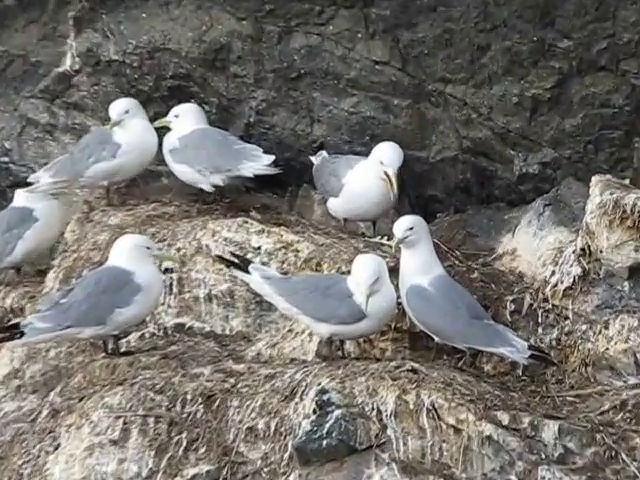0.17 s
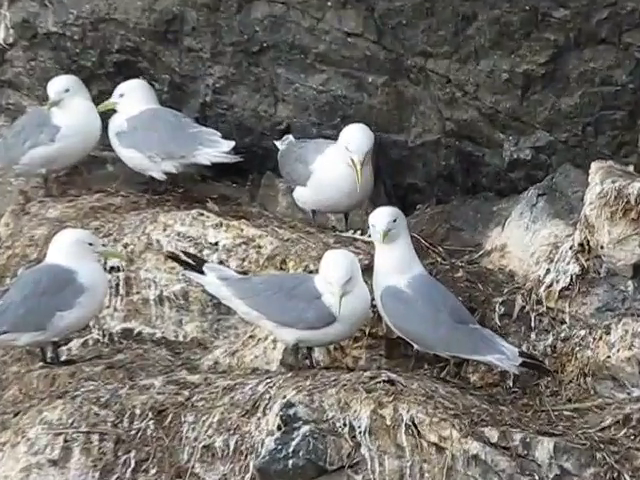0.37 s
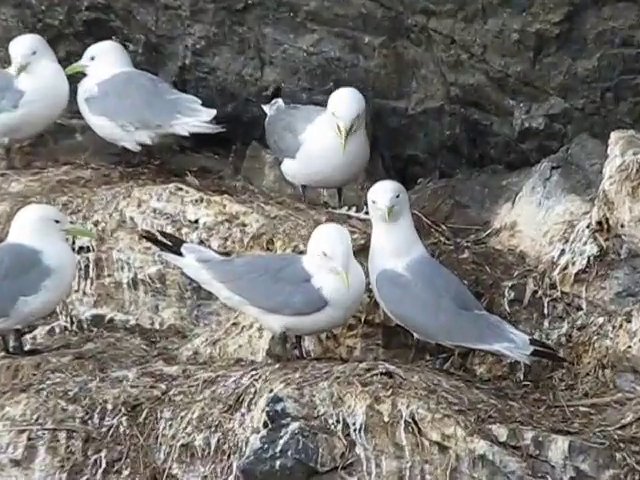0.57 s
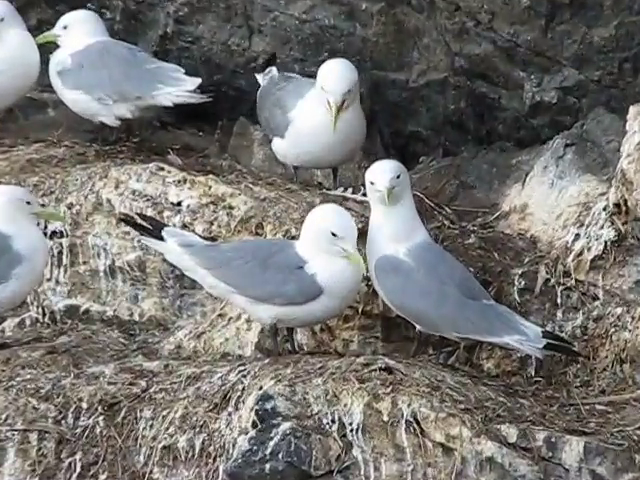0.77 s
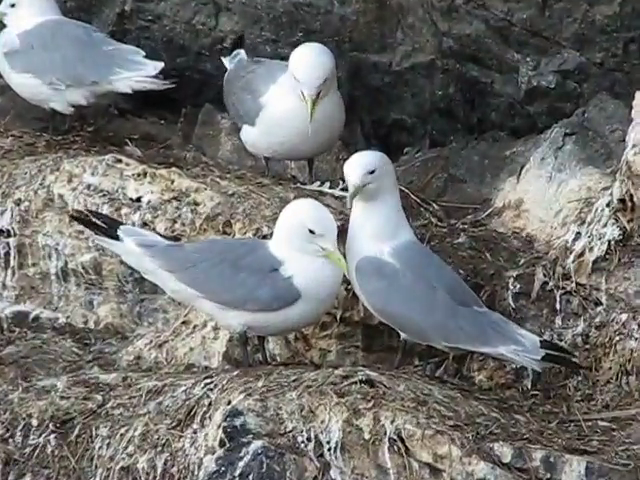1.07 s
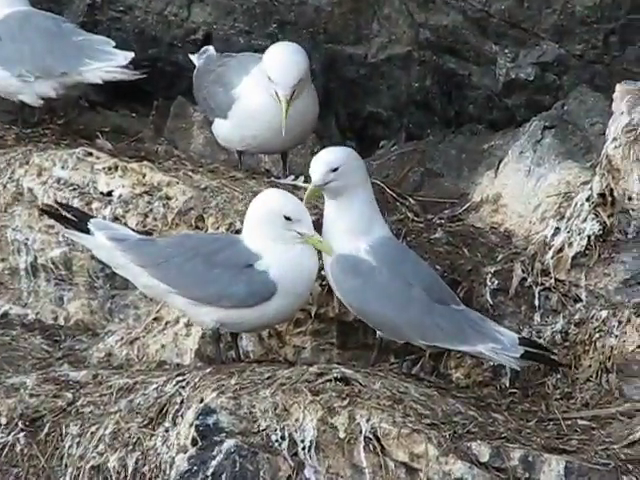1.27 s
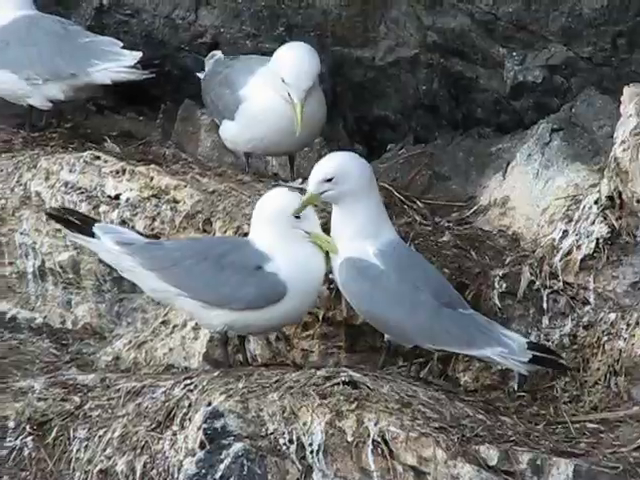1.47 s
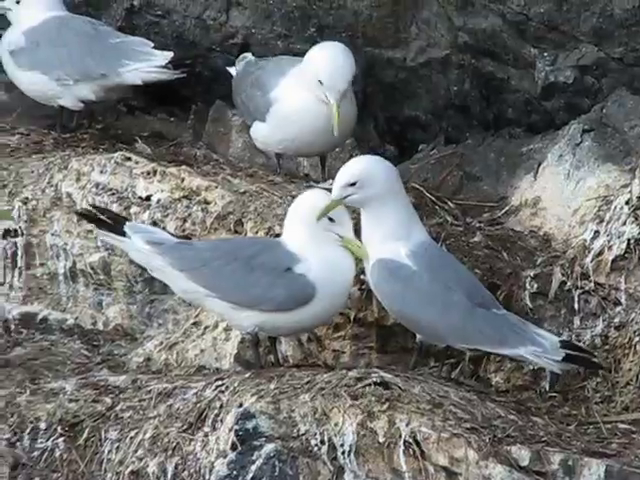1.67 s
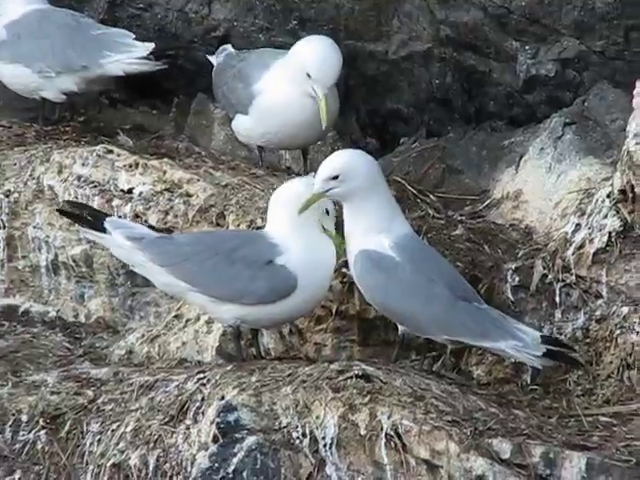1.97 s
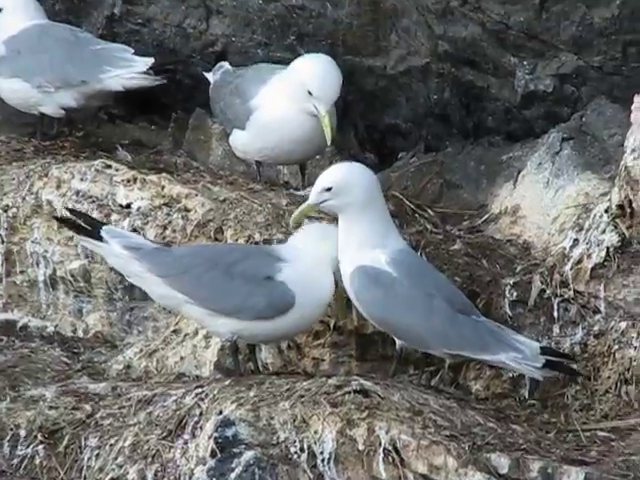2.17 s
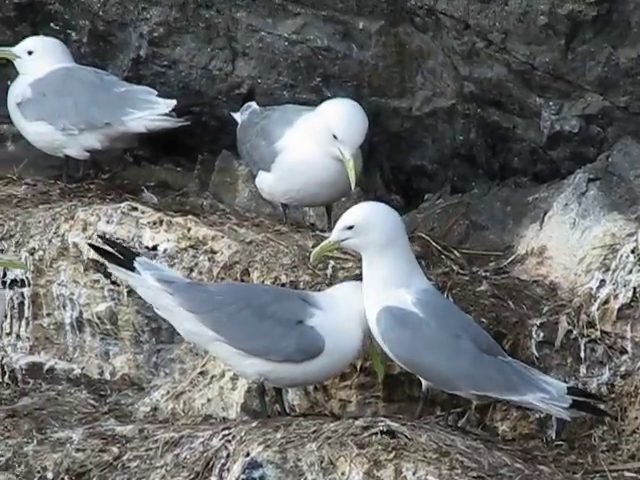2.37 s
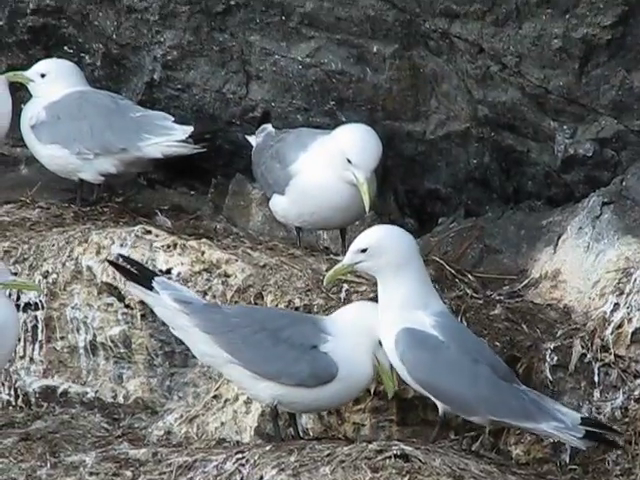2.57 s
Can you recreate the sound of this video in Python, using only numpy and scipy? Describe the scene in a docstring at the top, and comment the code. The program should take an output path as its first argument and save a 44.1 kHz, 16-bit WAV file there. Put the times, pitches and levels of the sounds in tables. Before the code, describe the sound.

Kittiwake colony clamoring on a sea cliff, nasal hoarse calls overlapping above steady surf

```python
"""A sea cliff with a kittiwake colony. Near birds throw nasal, partly hoarse notes and wavering wails across
each other: harmonics of a gliding pitch, filtered by throat and mouth and roughened by random modulation.
Thin squeaks sound among them, and upper harmonics of the calls ring out, each drawn as one wavering partial.
The rock returns the near calls as sparse decaying echoes. Behind them swell the far colony, a sum of random
calls, and a nearly steady surf of shaped noise."""
import sys
import numpy as np
from scipy import signal
from scipy.fft import rfft, irfft
from scipy.io import wavfile
from scipy.ndimage import uniform_filter1d

SR = 44100
rng = np.random.default_rng(int(sys.argv[2]) if len(sys.argv) > 2 else 0)


def pcm_store(signal):
    """Save signal as 16-bit PCM."""
    levels = np.round(np.clip(np.atleast_2d(signal), -1, 1) * 32767)
    wavfile.write(sys.argv[1], SR, levels.astype(np.int16).T)


N = 120393  # length [samples]


def amp(db):
    """Level: decibels to amplitude gain."""
    return 10 ** (np.asarray(db) / 20)


def unit(x):
    """Normalization: scales to an rms of 1."""
    return x / np.sqrt(np.mean(x ** 2) + 1e-20)


def read(points, hz):
    """Interpolation of a spectrum along a logarithmic frequency axis."""
    f, value = np.transpose(points)
    return np.interp(np.log(hz + 1), np.log(f + 1), value)


def over_time(points):
    """Linear interpolation of a control curve at every sample."""
    return np.interp(np.arange(N) / SR, *np.transpose(points))


def filtered(x, gain_db):
    """Zero-phase filtering: scales the spectrum by the level that gain_db(hz) returns."""
    size = x.shape[-1]
    return irfft(rfft(x) * amp(gain_db(np.fft.rfftfreq(size, 1 / SR))), size)


def add(mix, start_s, sound):
    """Superposition: adds a stereo sound to the mix at a time."""
    at = round(start_s * SR)
    part, sound = mix[:, max(at, 0):], sound[:, max(-at, 0):]
    size = min(part.shape[1], sound.shape[1])
    part[:, :size] += sound[:, :size]


def wobble(t, hz, size=256):
    """Random modulation: normal values at the given rate, joined by straight lines."""
    return np.interp(t * hz, np.arange(size), rng.standard_normal(size))


def sides(db):
    """Interaural level difference: left and right gains, positive to the left."""
    return amp(np.array([[.5], [-.5]]) * db)


ATTACK_S, RELEASE_S = 0.0047, 0.0098
JITTER, JITTER_HZ, RASP_HZ = 0.02, 130.3, 257.5  # pitch jitter as a share at full roughness; rates
UNEVEN_DB = 1.5  # chance differences between the harmonics of a call
# Share of the roughness that a harmonic takes: (frequency [Hz], share)
RASP_SHARE = [(1500, .45), (4500, .45), (8000, 1.3), (12000, 2.2)]
# Phase by which the left microphone leads: (frequency [Hz], phase [rad])
MIC_PHASE = [(100, 5.1), (1000, 0.4), (1640, 0.78), (3100, 1.68), (4200, 1.32), (5700, 1.97), (9000, 2.1),
             (15000, 4.7)]


def voice(pitch, colour, rough, pan_db, direction, count=26, release_s=RELEASE_S):
    """Source-filter voice: jittered harmonics weighted by the throat; modulation sidebands make the rasp."""
    t = np.arange(len(pitch)) / SR
    rough = np.clip(rough, 0, 1)
    jittered = pitch * (1 + JITTER * rough * wobble(t, JITTER_HZ))
    fundamental = np.exp(2j * np.pi * np.cumsum(jittered) / SR)
    out, partial = np.zeros((2, len(t))), np.ones(len(t), complex)
    shake = 1 + rough * 0.45 * wobble(t, RASP_HZ)
    for k in range(1, count + 1):
        partial = partial * fundamental  # the next power is the next harmonic
        hz = k * pitch.mean()
        rasp = min(rough * read(RASP_SHARE, hz), 1)
        smear = wobble(t, 2 * RASP_HZ) + 1j * wobble(t, 2 * RASP_HZ)
        own = amp(UNEVEN_DB * rng.standard_normal()) * np.exp(2j * np.pi * rng.random())
        audible = hz < SR / 2
        line = own * partial * amp(colour(k * pitch)) * audible * (1 - rasp + rasp * smear)
        right = line * np.exp(-1j * direction * read(MIC_PHASE, hz))
        out += [line.real, right.real]
    fade = np.clip(t / ATTACK_S, 0, 1) * np.clip((t[-1] - t) / release_s, 0, 1)
    return unit(out * shake) * fade * sides(pan_db)


MOUTH_WIDTH_HZ = 270  # half-width of the mouth resonance
GAPE, EDGE_DB = 0.035, -4  # nearly shut bill at a call's ends: share the resonance falls, level
SCOOP, SCOOP_S, DROOP, DROOP_S = .02, .007, .035, .008  # pitch slides into and drops out of a call [share]
# Range of the near birds' directions, as multiples of the microphone phase: (lowest, highest)
NEAR_DIRECTIONS = (0.25, 1.2)
# Throat response of a near bird: (frequency [Hz], level [dB])
THROAT = [(500, -15.5), (1080, -8.5), (1300, 0), (1700, -0.5), (2200, -7.5), (2800, 0), (4000, -5),
          (5000, -4), (6100, -11), (6850, -21), (7600, -21.5), (10000, -32.5), (15000, -41)]


def near_call(pitch, db, mouth_hz, mouth_db, rough, pan_db):
    """Moving formant: the call swells as the bill opens; the mouth resonance follows gape and pitch."""
    t = np.arange(len(pitch)) / SR
    shut = (2 * t / t[-1] - 1) ** 2
    centre_hz = mouth_hz * pitch / pitch.mean() * (1 - GAPE * (shut - shut.mean()))

    def colour(hz):
        """Vocal-tract response: the throat level plus the mouth's resonance peak."""
        return read(THROAT, hz) + mouth_db / (1 + ((hz - centre_hz) / MOUTH_WIDTH_HZ) ** 2)
    slide = 1 - SCOOP * np.exp(-t / SCOOP_S) - DROOP * np.exp((t - t[-1]) / DROOP_S)
    direction = rng.uniform(*NEAR_DIRECTIONS)
    return amp(db + EDGE_DB * shut) * voice(pitch * slide, colour, rough, pan_db, direction)


# Nasal notes: (start [s], length [s], first pitch [Hz], middle pitch [Hz], last pitch [Hz], level [dB],
# mouth resonance [Hz], its height [dB], roughness [0-1], left-right level [dB])
NOTES = [(0.075, 0.073, 545.6, 552, 552, -22.5, 2730, 10, 0.7, -5),
         (0.126, 0.069, 600, 614, 621, -25.5, 4290, 9.5, 0.13, 1),
         (0.114, 0.04, 633, 632, 630, -25, 2540, 8, 0.65, -1),
         (0.176, 0.06, 568.5, 599, 617, -22.5, 3000, 5, 0.42, -4),
         (0.277, 0.049, 611, 640, 670, -22.5, 2600, 15, 0.37, -4),
         (0.309, 0.036, 592, 607, 633, -20, 3040, 5, 0.25, -5),
         (0.335, 0.058, 558, 561, 541, -21, 1680, 7, 0.43, -3),
         (0.342, 0.076, 528, 536, 520, -25.5, 3750, 10, 0.8, -2),
         (0.344, 0.069, 654, 651, 648, -22.5, 2630, 17, 0.6, -5),
         (0.626, 0.045, 822, 817, 810, -22, 1635, 8, 0, -4),
         (0.627, 0.028, 663, 651, 640, -25, 3330, 15, 0, -7),
         (0.649, 0.027, 562, 599, 624, -20.5, 3000, 6, 0.54, -8),
         (0.757, 0.045, 677, 633, 660, -20, 3180, 7, 0.15, -2),
         (0.81, 0.05, 670, 687, 666, -24, 3350, 27, 0.42, 1),
         (0.815, 0.055, 633, 596, 523, -27.0, 1790, 13, 0.2, 3),
         (1.018, 0.039, 688, 698, 706, -20.0, 2840, 9, 0.3, -2),
         (1.052, 0.055, 498.7, 555.6, 570, -17, 2150, 12.5, 0.37, -2.5),
         (1.11, 0.053, 520, 505, 533, -19.5, 2670, 20, 0.87, -5),
         (1.176, 0.062, 675, 685, 673, -21, 3970, 9, 0.07, -1),
         (1.227, 0.06, 626.5, 651, 640, -20.5, 3780, 10.5, 0.44, 0),
         (1.231, 0.043, 562, 564, 550, -18.5, 3340, 10, 0.57, -2),
         (1.424, 0.054, 475, 502.5, 520, -23, 2500, 11, 0.2, 0),
         (1.466, 0.051, 526.5, 544, 560, -21, 2160, 8, 0.37, -1),
         (1.51, 0.05, 641, 664, 650, -24, 3950, 7, 0.37, -1),
         (1.56, 0.032, 613, 637, 667, -21, 3160, 15, 0, -3),
         (1.656, 0.08, 667, 685, 662, -23, 3420, 19, 0.19, -2),
         (1.679, 0.057, 725, 740, 766, -22, 3690, 8, 0.01, -2),
         (1.727, 0.048, 755, 763, 763, -24, 4640, 4, 0.35, 1.5),
         (1.897, 0.083, 538, 547.5, 570, -23.5, 2800, 10, 0.7, -1),
         (2.028, 0.037, 567, 558, 535, -19.5, 3330, 9, 0.38, -6),
         (2.124, 0.056, 637.5, 640, 630, -18.5, 3740, 11.5, 0.2, -2),
         (2.155, 0.033, 615, 630, 654, -32, 4430, 9, 0.8, -4),
         (2.2, 0.11, 680.6, 726, 724, -24.5, 3550, 9, 0.01, 5),
         (2.238, 0.099, 553, 549, 529, -23, 2200, 22, 0.65, -5),
         (2.328, 0.071, 644, 648, 620, -31, 3850, 29, 0, 4),
         (2.418, 0.11, 645, 645.5, 628, -26.5, 1930, 5, 0.5, 5),
         (2.589, 0.044, 556, 568, 564, -20.0, 2790, 11, 0.22, -3),
         (2.615, 0.051, 694, 692, 665, -24, 3440, 8, 0.1, 0),
         (2.672, 0.084, 612, 608, 620, -23.5, 4850, 5, 0.25, 0)]


def notes():
    """Frequency modulation: short nasal notes whose pitch bends in one parabolic arc."""
    out = np.zeros((2, N))
    for start, length, first, middle, last, *rest in NOTES:
        u = np.linspace(0, 1, int(length * SR))
        arc = np.polyfit([0, .5, 1], [first, middle, last], 2)
        add(out, start, near_call(np.polyval(arc, u), *rest))
    return out


WAIL_LEAD_S, WAIL_S = .05, .135  # time before the dip, whole length
DIP, DIP_S, WAIL_SAG, SAG_S = .057, .018, .02, .075  # depths are shares of the top pitch
# Wails: (time of the pitch dip [s], top pitch [Hz], level [dB], mouth resonance [Hz], its height [dB],
# roughness [0-1], left-right level [dB])
WAILS = [(.795, 570, -22, 2780, 8, 0.42, -5.5), (1.225, 560.6, -25, 2760, 10.5, 0.31, -6),
         (1.635, 564.6, -22, 2700, 5.5, 0.11, -4), (2.386, 556, -23, 2750, 10.5, 0.26, -4)]


def wails():
    """Frequency modulation: longer calls that dip in pitch, recover and sag away."""
    out = np.zeros((2, N))
    for dip_at, top_hz, *rest in WAILS:
        t = np.arange(0, WAIL_S, 1 / SR) - WAIL_LEAD_S
        dip = DIP * np.exp(-(t / DIP_S) ** 2)
        sag = WAIL_SAG * (t / SAG_S) ** 4
        add(out, dip_at - WAIL_LEAD_S, near_call(top_hz * (1 - dip - sag), *rest))
    return out


SQUEAK_TOP_AT, SQUEAK_FALL = .24, .27  # shares of the length and of the pitch
SQUEAK_HISS_DB = -11  # relative to the tone
# Squeaks: (start [s], length [s], top pitch [Hz], level [dB])
SQUEAKS = [(.395, .052, 1640, -29.5), (.897, .06, 1775, -29), (1.355, .06, 1680, -45)]
# Throat response of a squeak: (frequency [Hz], level [dB])
SQUEAK_THROAT = [(1700, -14), (3400, -4), (5000, 0), (6800, -11), (8400, -13), (11000, -20), (13000, -20),
                 (16000, -25)]


def squeaks():
    """Tone plus turbulence: high harmonics arch and fall, with a little hiss strongest early on."""
    def colour(hz):
        """Vocal-tract response of the squeak."""
        return read(SQUEAK_THROAT, hz)
    out = np.zeros((2, N))
    for start, length, top_hz, db in SQUEAKS:
        u = np.linspace(0, 1, int(length * SR))
        pitch = top_hz * (1 - SQUEAK_FALL * (u - SQUEAK_TOP_AT) ** 2)
        call = voice(pitch, colour, rough=.05, pan_db=0, direction=.45, count=9, release_s=.01)
        # the hiss takes half the throat's decibels
        hiss = filtered(rng.standard_normal((2, len(u))), lambda hz: colour(hz) / 2)
        hiss = unit(hiss * np.sin(np.pi * np.sqrt(u)))
        add(out, start, amp(db) * (call + amp(SQUEAK_HISS_DB) * hiss))
    return out


WAVER, WAVER_HZ = 0.0062, 89  # share of the frequency, rate
# Ringing upper harmonics: (start [s], length [s], frequency [Hz], glide [share of it], level [dB])
RINGING_HARMONICS = [(0.282, .055, 8500, -0.016, -49.5), (0.704, 0.027, 6800, -0.00055, -41.5),
                     (0.928, 0.051, 4350, 0.0093, -40), (1.084, 0.059, 6770, .005, -45.5),
                     (1.36, 0.057, 4800, 0.011, -37), (2.635, 0.039, 4690, -.035, -32.5),
                     (1.558, 0.048, 6900, 0.011, -44), (2.003, 0.057, 6800, 0.027, -46.5),
                     (2.34, .05, 8400, -0.021, -56)]


def ringing_harmonics():
    """Harmonic resonance: upper harmonics of the calls ring out briefly, each drawn as one wavering partial."""
    out = np.zeros((2, N))
    for start, length, hz, glide, db in RINGING_HARMONICS:
        t = np.arange(0, length, 1 / SR)
        waver = WAVER * wobble(t, WAVER_HZ)
        track_hz = hz * (1 + glide * (t / length - .5) + waver)
        tone = voice(track_hz, np.zeros_like, rough=0.096, pan_db=14, direction=0.18, count=1)
        add(out, start, amp(db) * tone)
    return out


CLIFF_T60, CLIFF_DB, CLIFF_GAP_S = .2, -9, .006  # near-call decay time [s], return level, first delay


def cliff(x, t60):
    """Diffuse reflection: sparse decaying returns from the rock face, different at each microphone."""
    t = np.arange(SR // 2) / SR
    sparse = rng.random((2, len(t))) < .05
    taps = rng.standard_normal((2, len(t))) * sparse * amp(-60 * t / t60) * (t > CLIFF_GAP_S)
    taps /= np.linalg.norm(taps, axis=1, keepdims=True)
    return signal.fftconvolve(x, taps, axes=1)[:, :N]


COLONY_DB, SPLIT_HZ = -22.5, 2400  # chorus gain; where body and top part
BODY_SHARE, SWELL_SHARE = 0.86, 0.92  # shares of the level curves, about their means, that are applied
THROAT_SPREAD = .09  # the far birds' resonances differ by up to this share either way
COLONY_SPREAD = 0.75  # directions spread about 1 by this multiple of the microphone phase
# Throat response of the far birds: (frequency [Hz], level [dB])
COLONY_COLOUR = [(500, -22.5), (900, -8), (1250, -13.5), (1750, 5.5), (2200, 0), (2700, 2), (3700, 1.5),
                 (4900, -8), (6300, -19), (8000, -24), (11000, -29), (15500, -38)]
# Relative chorus level below the split: (time [s], level [dB])
COLONY_BODY = [(0, -20), (.38, -25.5), (.48, -21), (.68, -21.5), (1, -29.5), (1.09, -24.5), (1.25, -21),
               (1.34, -31.5), (1.5, -25.5), (1.76, -22), (1.82, -22.5), (2.2, -23.5), (2.73, -22.5)]
# Relative chorus level above the split: (time [s], level [dB])
COLONY_SWELL = [(0.0, -27.5), (0.2, -20), (0.24, -31), (0.36, -20.5), (0.49, -29.5), (0.67, -17.5),
                (0.72, -25.5), (0.78, -18.5), (0.99, -33.5), (1.04, -24.5), (1.28, -21.5), (1.31, -28.5),
                (1.7, -20.5), (1.8, -28.5), (2.05, -21.5), (2.08, -26.5), (2.17, -22), (2.73, -29)]


def colony(low_hz=460, high_hz=720, spread_db=3, t60=0.23, direct=0.89):
    """Incoherent sum: far birds call at random, blurred by the rock; body and top swell and thin apart."""
    out, count = np.zeros((2, N)), 110
    arch, rough = .55, .16
    for place, size, high, top, loud, side, throat in rng.random((count, 7)):
        u = np.linspace(0, 1, int((0.06073 + .12 * size) * SR))
        pitch = (low_hz + (high_hz - low_hz) * high) * (1 - arch * (u - top) ** 2 / 2)
        stretch = 1 + THROAT_SPREAD * (2 * throat - 1)
        direction = 1 + COLONY_SPREAD * (2 * side - 1)
        call = voice(pitch, lambda hz: read(COLONY_COLOUR, hz * stretch), rough, 0, direction, count=24)
        add(out, place * (N / SR + .1) - .1, amp(spread_db * 2 * loud) * call)
    crowd = direct * out + cliff(out, t60)
    # even out the chance swells before the level curves are applied
    crowd = crowd / np.sqrt(uniform_filter1d((crowd ** 2).mean(0), size=6000) + 1e-9)
    lowpass = 1 / (1 + (np.fft.rfftfreq(N, 1 / SR) / SPLIT_HZ) ** 10)
    body = irfft(rfft(crowd) * lowpass, N)
    body_db, top_db = over_time(COLONY_BODY), over_time(COLONY_SWELL)
    body_gain = amp(BODY_SHARE * (body_db - body_db.mean()))
    top_gain = amp(SWELL_SHARE * (top_db - top_db.mean()))
    return amp(COLONY_DB) * (body * body_gain + (crowd - body) * top_gain)


SURF_DB = 7  # added to the level curve
# Relative spectral density of the surf: (frequency [Hz], level [dB])
SURF = [(25, -19), (60, -16), (130, -12), (210, -11.5), (330, -6), (470, -5), (550, -6), (640, -2.5),
        (780, -9), (1200, -4.5), (1800, -2.5), (3500, -4), (5000, -10), (6500, -27), (11000, -35),
        (15500, -50)]
# Relative level of the surf: (time [s], level [dB])
SURF_LEVEL = [(0.0, -27), (0.03, -28), (1.58, -31), (2.44, -31), (2.73, -30)]
# Left-right coherence of the surf: (frequency [Hz], coherence)
SURF_LIKENESS = [(60, 1), (290, 0.96), (640, 0.99), (1400, 0.79), (3100, 0), (15000, 0)]


def surf():
    """Partly coherent noise: a nearly steady filtered wash, alike at both microphones in the bass."""
    hz = np.fft.rfftfreq(N, 1 / SR)
    left, other = rfft(rng.standard_normal((2, N)))
    same = np.clip(read(SURF_LIKENESS, hz), -1, 1)
    right = same * left + np.sqrt(1 - same ** 2) * other
    wash = irfft(np.array([left, right]) * amp(read(SURF, hz)), N)
    return amp(SURF_DB + over_time(SURF_LEVEL)) * unit(wash)


def scene():
    """Superposition: near birds and their echo over the far colony and the surf."""
    near, thin = notes() + wails(), squeaks() + ringing_harmonics()
    echo = cliff(amp(CLIFF_DB) * near, CLIFF_T60)
    return near + thin + echo + surf() + colony()


CUTOFF_HZ = 15650
# Level difference of the microphones: (frequency [Hz], left-right level [dB])
MIC_BALANCE = [(100, 0), (1200, 1.5), (2000, -1), (3300, 1), (4800, 6), (6000, 4), (9000, 3.5),
               (15000, 0.5)]


def record(dry):
    """Linear filtering: the left microphone is brighter; a steep band limit follows."""
    balance = sides(read(MIC_BALANCE, np.fft.rfftfreq(N, 1 / SR)))
    coloured = irfft(rfft(dry) * balance, N)
    lowpass = signal.firwin(511, CUTOFF_HZ, window=("kaiser", 9), fs=SR)
    return signal.oaconvolve(coloured, lowpass[None], "same")


dry = scene()
out = record(dry)
pcm_store(out)
```